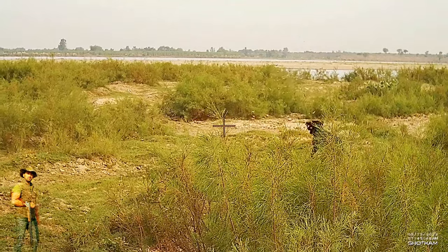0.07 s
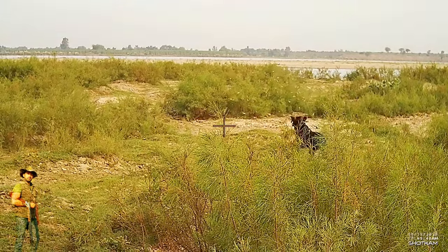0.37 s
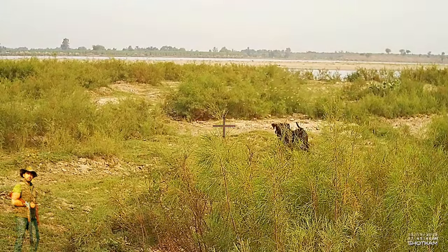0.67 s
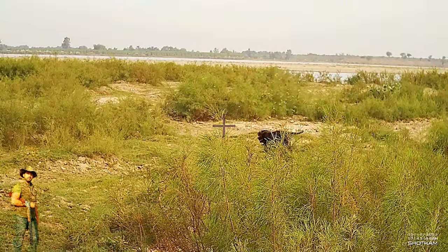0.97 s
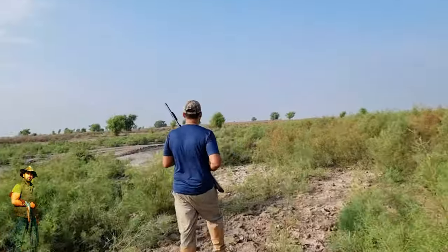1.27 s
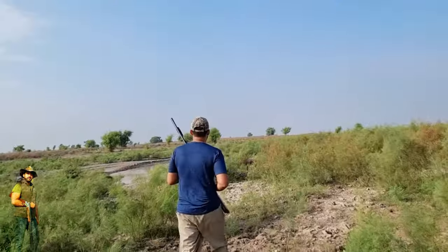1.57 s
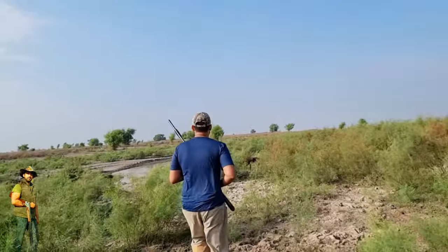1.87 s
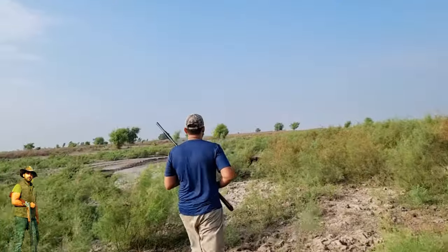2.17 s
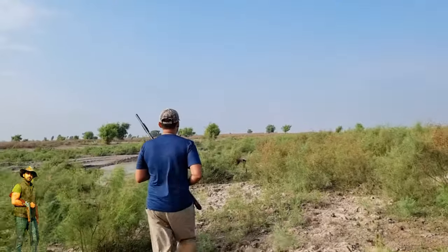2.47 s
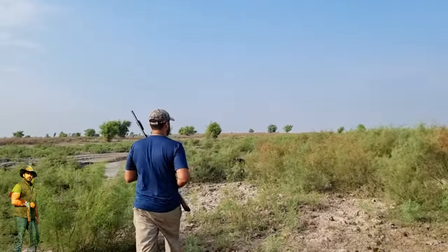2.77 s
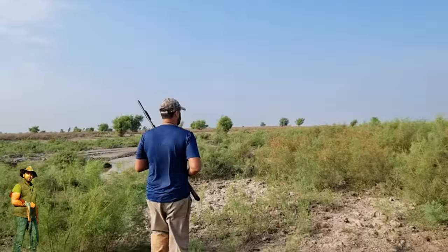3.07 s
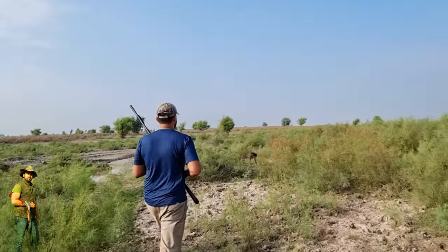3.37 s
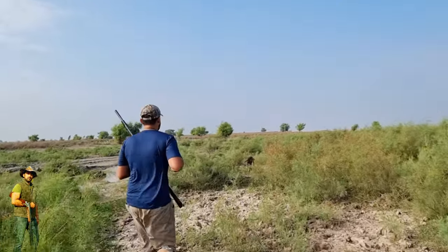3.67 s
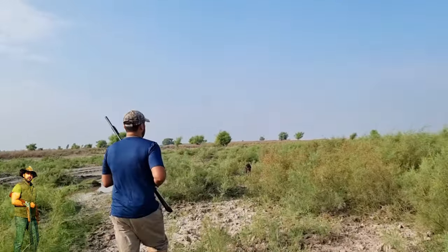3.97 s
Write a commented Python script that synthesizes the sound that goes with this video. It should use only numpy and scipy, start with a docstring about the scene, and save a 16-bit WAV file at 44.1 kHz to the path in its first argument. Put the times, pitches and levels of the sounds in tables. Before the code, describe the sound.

Someone walks through dry scrub in the open, crushing stalks and clods and brushing past grass. The steps start abruptly after a quiet hiss, with low wind buffeting the microphone and a few faint, distant bird whistles.

```python
"""Footsteps through dry brush, cutting in after a quiet mono opening of hiss and faint low tones.
Brittle fracture makes the steps: soles crush stalks and clods in showers of impulses, and twigs snap.
Grass sweeps along the legs, and stiff stems scrape across cloth by stick-slip friction.
Turbulent wind rumbles and thumps on the microphone, while a small bird whistles far off."""
import sys
import numpy as np
from scipy import signal
from scipy.fft import rfft, irfft
from scipy.io import wavfile
from scipy.ndimage import uniform_filter1d

SR = 44100
rng = np.random.default_rng(int(sys.argv[2]) if len(sys.argv) > 2 else 0)


def int16_out(signal):
    """Quantize to a 16-bit WAV file."""
    q = np.round(np.clip(np.atleast_2d(signal).T, -1, 1) * 32767)
    wavfile.write(sys.argv[1], SR, q.astype(np.int16))


N = 176400


def undb(db):
    """Amplitude ratio of a level in decibels."""
    return 10 ** (np.asarray(db) / 20)


def unit(x):
    """Normalisation to an rms of 1."""
    return x / np.sqrt(np.mean(x ** 2) + 1e-20)


def colour(x, points):
    """Minimum-phase filter of unit power through (frequency [Hz], level [dB]) points."""
    hz, db = np.array(points, float).T
    gain = unit(undb(np.interp(np.log(np.fft.rfftfreq(2 * N, 1 / SR) + 1), np.log(hz), db)))
    cepstrum = irfft(np.log(gain))
    cepstrum[1:N] *= 2
    cepstrum[N + 1:] = 0
    return irfft(rfft(x, 2 * N) * np.exp(rfft(cepstrum)))[..., :N]


def band(x, hz, kind, order=2):
    """Butterworth filter: a maximally flat passband."""
    return signal.sosfilt(signal.butter(order, hz, kind, fs=SR, output="sos"), x)


def ring(x, hz, width):
    """Second-order resonance of fractional bandwidth width = 1/Q."""
    return signal.lfilter(*signal.iirpeak(hz, 1 / width, fs=SR), x)


def wander(rate_hz):
    """Smoothed random fluctuation of rms 1."""
    hold = int(SR / rate_hz)
    steps = np.repeat(rng.standard_normal(N // hold + 1), hold)
    return unit(uniform_filter1d(uniform_filter1d(steps, hold), hold)[:N])


def pair(correlation):
    """Partially coherent white noise, left and right."""
    common = np.sqrt(correlation) * rng.standard_normal(N)
    return common + np.sqrt(1 - correlation) * rng.standard_normal((2, N))


def pan(x, db):
    """Interaural level difference, left minus right; negative leans right."""
    return x * undb(np.array([[db], [-db]]) / 2)


def scatter(x, tail_db, tail_s):
    """Scattering by nearby stems and ground adds a diffuse tail, different at each ear."""
    t = np.arange(SR // 10) / SR
    tail = unit(rng.standard_normal((2, len(t))) * np.exp(-t / tail_s)) / np.sqrt(len(t))
    return x + undb(tail_db) * signal.fftconvolve(np.atleast_2d(x), tail, axes=1)[:, :N]


def glides(t, rows, waver, flutter_db):
    """Frequency modulation: sine tones swell and fade along parabolic pitch curves."""
    tones = np.zeros(N)
    drift = 1 + waver * wander(90)
    flutter = undb(flutter_db * wander(50))
    for start, length, first_hz, middle_hz, last_hz, db in rows:
        progress = np.clip((t - start) / length, 0, 1)
        hz = np.polyval(np.polyfit([0, .5, 1], [first_hz, middle_hz, last_hz], 2), progress) * drift
        envelope = np.sqrt(2 * np.abs(np.sin(np.pi * progress)))
        tones += undb(db) * envelope * np.sin(2 * np.pi * np.cumsum(hz) / SR)
    return tones * flutter


def burst(t, peak, rise, decay, per_s, spread_db, max_lag_s=.00026):
    """Shot noise that swells and decays; each impulse has its own size and interaural delay."""
    swell = np.clip(1 + (t - peak) / (2.74 * rise), 0, 1) ** 2
    envelope = swell * np.exp(-np.clip((t - peak) / decay, 0, 30))
    place, size, sign, side = rng.random((int(per_s * N / SR), 4)).T
    sizes = undb(-spread_db * np.log(np.maximum(1 - size, .02))) * np.sign(sign - .5)
    lag = (side - .5) * max_lag_s * SR
    impulses = [np.bincount((place * N + ear * lag).astype(int) % N, sizes, N) for ear in (1, -1)]
    x = np.array(impulses) * envelope
    return x * np.sqrt(2 * np.sum(envelope ** 2) / (np.sum(x ** 2) + 1e-20))


def fractures(t, rows, per_s, spread_db, crossover_hz=7500):
    """Superposed showers of plant fractures; finer stems radiate more treble."""
    body, fine = 0, 0
    for peak, rise, decay, db, treble_db in rows:
        shower = undb(db) * burst(t, peak, rise, decay, per_s, spread_db)
        body += shower
        fine += undb(treble_db) * shower
    treble_share = 1 / (1 + (crossover_hz / (np.fft.rfftfreq(N, 1 / SR) + 1)) ** 5)
    return irfft(rfft(body) * (1 - treble_share) + rfft(fine) * treble_share, N)


def hiss():
    """Stationary band-limited noise, alike in both ears."""
    # hiss spectrum (frequency [Hz], relative density [dB])
    spectrum = [(12, -34.5), (20, 7.5), (39, -4.5), (157, -13), (264, -18), (598, -23), (1140, -28.5),
                (1350, -29), (6460, -34.5), (7500, -37.5), (9750, -41), (16500, -120)]
    noise = colour(rng.standard_normal(N), spectrum)
    return undb(-58) * unit(band(noise, hz=8010, kind="lowpass", order=18))


def low_tones(t):
    """Faint, nearly sinusoidal tones that bend in pitch."""
    # tones (start [s], length [s], first pitch [Hz], middle pitch [Hz], last pitch [Hz], level [dB])
    notes = [(0.057, 0.1, 180, 176, 150, -61.5), (0.388, 0.26, 180, 174, 143, -63),
             (.48, .26, 265, 238, 202, -69.5), (0.42, 0.27, 370, 510, 440, -78),
             (1.05, 0.14, 200, 221, 199, -60)]
    return glides(t, notes, waver=0.0044, flutter_db=2.5)


def air():
    """Ambient noise of the open air, only weakly coherent between the ears."""
    # ambient spectrum (frequency [Hz], relative density [dB])
    spectrum = [(100, -0.5), (400, 7.5), (1000, -4), (1900, -3.5), (3000, -8.5), (5500, -14), (7500, -8.5),
                (8600, -23.5), (12500, -23), (16000, -26.5)]
    gain = undb(-66.5 + 0.27 * wander(5.54))
    return pan(gain * colour(pair(0.22), spectrum), db=-4.5)


def wind(t):
    """Turbulent pressure rumbles on the microphone ports; large eddies reach both nearly alike."""
    # strength of the large and of the small eddies (time [s], level [dB])
    large_levels = [(1.2, -45), (1.42, -45.5), (1.6, -46.5), (1.7, -43.5), (1.88, -43.5), (2.03, -40.5),
                    (2.2, -42.5), (2.4, -42.5), (2.74, -44.5), (2.9, -44.5), (3.1, -37.5), (3.22, -43),
                    (3.4, -39.5), (3.55, -41), (3.68, -45.5), (3.84, -40), (4.0, -49)]
    small_levels = [(1.2, -58.5), (1.55, -53), (1.93, -48.5), (2.02, -46), (2.4, -44.5), (2.52, -47),
                    (2.62, -44.5), (2.68, -43.5), (2.78, -42.5), (2.9, -58), (3.1, -48), (3.22, -50.5),
                    (3.32, -46.5), (3.47, -46.5), (3.66, -58.5), (3.8, -46.5), (3.89, -54), (4.0, -46.5)]
    # their spectra (frequency [Hz], relative density [dB])
    large_spectrum = [(15, -26.5), (30, -12), (50, -1.5), (66, -0.5), (82, 2), (105, -4), (130, -9.5),
                      (180, -30), (400, -52), (3000, -83)]
    small_spectrum = [(40, -13.5), (100, -16.5), (140, 0), (200, -6), (300, -13.5), (400, -21), (470, -27),
                      (900, -49), (3000, -68.5)]
    large = unit(colour(pair(0.82), large_spectrum))
    large *= undb(np.interp(t, *np.array(large_levels).T) + 1.63 * wander(21.935))
    small = unit(colour(pair(0.36), small_spectrum))
    small *= undb(np.interp(t, *np.array(small_levels).T) + 2 * wander(28.005))
    return large + small


def stems(t):
    """Stick-slip friction on cloth drives each stiff stem at its own resonance."""
    # scrapes (peak [s], rise [s], decay [s], relative level [dB], resonance [Hz])
    scrapes = [(1.202, 0.0037, .04, -64, 1880), (1.27, .015, 0.066, -69, 1620),
               (2.568, .008, 0.018, -70, 12400), (2.638, 0.01, 0.013, -61, 12500),
               (2.642, 0.011, 0.011, -69, 9700), (2.735, 0.018, 0.022, -69, 12300),
               (2.77, .015, .015, -71, 9600)]
    x = 0
    for peak, rise, decay, db, hz in scrapes:
        slips = burst(t, peak, rise, decay, per_s=3600, spread_db=6)
        width = 0.12 * (10000 / hz) ** 0.67
        x += undb(db) * slips.std() * unit(ring(ring(slips, hz, width), hz, width))
    return pan(x, db=-12.5)


def grass(t):
    """Dense, tiny fractures merge into a rustle as grass sweeps along the legs and springs back."""
    # sweeps (peak [s], rise [s], decay [s], relative level [dB], treble gain [dB])
    sweeps = [(1.265, 0.055, 0.1, -64, 0), (1.346, 0.0089, 0.04, -51, -18), (1.40, 0.018, 0.088, -58, -20),
              (1.84, 0.033, 0.12, -56.5, -8), (2.07, 0.037, 0.091, -59.5, 3.5),
              (2.242, 0.052, 0.017, -61, 8.5), (2.459, 0.012, 0.0078, -58, 3.5),
              (2.60, 0.016, 0.11, -57, -18), (2.643, 0.013, 0.013, -53.5, 2.5),
              (2.76, 0.033, 0.032, -63, 8), (2.86, 0.16, 0.12, -69.5, -19), (2.999, 0.018, 0.17, -63, -20),
              (3.125, 0.051, 0.1, -56.5, -12), (3.288, 0.011, 0.041, -63.5, 2),
              (3.39, 0.074, 0.33, -65, -12), (3.588, 0.046, 0.068, -51.5, -13),
              (3.70, 0.018, 0.054, -56, -2), (3.841, 0.084, 0.053, -58.5, -0.5),
              (3.975, 0.029, 0.016, -56, -14)]
    # rustle spectrum (frequency [Hz], relative density [dB])
    spectrum = [(200, -27), (700, -16), (1050, 0.5), (1500, 2.5), (2400, 3), (3500, -1.5), (5000, -5.5),
                (7400, -5), (8600, -16.5), (11000, -14.5), (12500, -9.5), (13800, -12.5), (16000, -8.5)]
    rustle = colour(fractures(t, sweeps, per_s=4000, spread_db=3.5), spectrum)
    return pan(scatter(rustle, tail_db=-10.5, tail_s=0.011), db=-5)


def buffets(t):
    """Single eddies thump the ports for a few cycles; their phase difference grows with frequency."""
    # pressure pulses (peak [s], Gaussian width [s], level [dB], pitch [Hz])
    pulses = [(1.28, 0.016, -46.5, 150), (1.576, 0.0091, -38.5, 79), (1.657, 0.011, -41, 154),
              (1.731, 0.012, -36, 69.2), (1.793, 0.012, -41, 69), (1.833, 0.011, -44.5, 151),
              (1.984, 0.035, -45.5, 230.3), (2.047, 0.017, -31.5, 86), (2.16, 0.034, -37.5, 100),
              (2.218, 0.016, -35, 84), (2.24, 0.029, -43.5, 175.3), (2.267, 0.014, -37.5, 70.3),
              (2.30, .012, -32, 118.9), (2.348, 0.0072, -35, 155.5), (2.432, .008, -52.5, 245.5),
              (2.451, .014, -35.5, 101), (2.485, 0.022, -45, 144.4), (2.594, .018, -41, 85.7),
              (2.702, 0.006, -47, 272), (2.725, 0.015, -35, 97.3), (2.774, .03, -56, 281.7),
              (3.008, 0.025, -38, 70.36), (3.108, 0.03, -41, 79.5), (3.233, 0.0098, -35.5, 143),
              (3.487, 0.024, -40, 148.8), (3.522, 0.0197, -34.5, 75.7)]
    radians_per_hz, pitch_wander = 0.0086, 0.1576
    x = 0
    for peak, width, db, hz in pulses:
        envelope = np.exp(-.5 * ((t - peak) / width) ** 2)
        port_phase = radians_per_hz * hz * rng.choice([-1, 1]) * np.array([[.5], [-.5]])
        cycles = rng.random() + np.cumsum(hz * (1 + pitch_wander * wander(120))) / SR
        x += undb(db) * np.sqrt(2) * envelope * np.sin(2 * np.pi * cycles + port_phase)
    return x


def twigs(t):
    """Brittle fracture: each twig splinters for a moment, then cracks in a broad resonance."""
    # cracks of twigs and grit (peak [s], relative level [dB], resonance [Hz])
    snaps = [(1.303, -48, 1450), (1.388, -40, 1200), (1.398, -42, 1250), (1.406, -50.5, 2880),
             (1.445, -50, 1870), (1.531, -55, 2160), (1.811, -38, 3080), (1.828, -42, 2900),
             (1.842, -45, 2670), (1.909, -50, 5300), (1.947, -52.5, 3400), (2.008, -45, 2400),
             (2.016, -39, 1870), (2.081, -45, 3880), (2.136, -48.5, 1890), (2.272, -40, 4520),
             (2.341, -56, 4020), (2.365, -48, 2750), (2.516, -41, 1900), (2.548, -47, 1990),
             (2.762, -53.5, 3050), (2.942, -52, 3840), (2.968, -51, 1540), (2.996, -43.5, 2230),
             (3.056, -40.5, 1780), (3.093, -38.5, 1420), (3.101, -34.5, 5830), (3.107, -38.5, 1400),
             (3.147, -50, 5030), (3.161, -53.5, 5100), (3.198, -53, 4000), (3.285, -53, 2010),
             (3.54, -52, 3780), (3.637, -55, 2300), (3.746, -53, 4440), (3.813, -49, 1700),
             (3.855, -50, 2080)]
    splinter_s, decay_s = 0.00088, 0.0016
    x = 0
    for peak, db, hz in snaps:
        falloff = np.where(t < peak, (peak - t) / splinter_s, (t - peak) / decay_s)
        crack = unit(band(pair(0.14), [hz * 0.71, hz * 1.334], "bandpass"))
        x += undb(db) * np.exp(-np.clip(falloff, 0, 30)) * crack
    return pan(undb(-3) * scatter(x, tail_db=-3, tail_s=0.008), db=-4)


def stalks(t):
    """Dry stalks fracture under the load of a sole in short, coarse crunches."""
    # crunches (peak [s], rise [s], decay [s], relative level [dB], treble gain [dB])
    crunches = [(1.333, 0.0086, 0.0048, -40.5, -2), (1.813, 0.015, 0.0059, -48, -13),
                (1.826, 0.0028, 0.011, -44, -8), (2.013, 0.018, .01, -46, -17),
                (2.052, .001, 0.008, -44.5, -0.5), (2.276, 0.018, 0.003, -54.5, 6.5),
                (2.312, 0.0049, 0.014, -53, -2), (2.343, 0.0023, 0.016, -50, -6),
                (2.367, 0.0077, 0.0024, -47, -8), (2.511, 0.0091, 0.0091, -53.5, -31),
                (2.552, 0.0094, 0.0099, -47, -5.5), (3.058, 0.0052, 0.016, -50, -15),
                (3.094, 0.0051, 0.019, -52.5, 2), (3.105, 0.0018, 0.0037, -43.5, 0),
                (3.305, 0.0037, 0.0062, -55, -3), (3.544, 0.0036, 0.0094, -49, -4),
                (3.672, .003, 0.0049, -51, -6), (3.865, 0.0029, 0.0027, -64, 16),
                (3.998, 0.0038, .01, -55, -8)]
    # crunch spectrum (frequency [Hz], relative density [dB])
    spectrum = [(200, -33), (700, -45), (1100, -16.5), (1450, -0.5), (2300, 1), (3400, 0.5), (5000, -2.5),
                (6200, -5), (7400, -1), (8600, -13.5), (12500, -10), (16000, -13)]
    crunch = colour(fractures(t, crunches, per_s=3200, spread_db=1.5), spectrum)
    return pan(scatter(crunch, tail_db=-8.5, tail_s=0.033), db=-5)


def clods(t):
    """Granular crumbling of dry soil underfoot; smaller clods resonate higher."""
    # weight landing on clods (peak [s], rise [s], decay [s], relative level [dB], resonance [Hz])
    treads = [(1.334, 0.005, 0.027, -50, 560), (1.385, .023, 0.043, -50, 620),
              (1.531, 0.0012, 0.0043, -52.5, 880), (1.755, 0.056, 0.091, -61.5, 414),
              (2.016, .016, 0.012, -47.5, 526), (2.14, 0.053, 0.072, -68, 474),
              (2.362, 0.01, 0.0036, -55, 490), (2.434, 0.0063, 0.028, -67, 497),
              (2.532, .0033, .006, -47.5, 770), (2.546, 0.0034, 0.01, -41, 810),
              (2.56, 0.0039, 0.0032, -50.5, 800), (2.64, 0.029, 0.011, -62, 1240),
              (2.704, 0.021, 0.015, -58, 750), (2.754, .022, 0.028, -56.5, 467),
              (3.102, 0.0088, 0.013, -55, 1360), (3.284, .002, 0.013, -53.5, 560),
              (3.40, 0.033, 0.079, -69.5, 550), (3.608, 0.0079, 0.0079, -51.5, 680),
              (3.637, .002, 0.011, -52, 616), (3.695, 0.018, 0.031, -54.5, 606),
              (3.759, 0.0039, 0.0085, -51.5, 990), (3.815, .002, 0.017, -52, 880)]
    # dull response of the soil (frequency [Hz], relative gain [dB])
    soil = [(80, -26.5), (250, -1), (420, 0), (800, -5), (1100, -6.5), (1500, -3.5), (2500, -15.5),
            (6000, -15), (16000, -46)]
    x = 0
    for peak, rise, decay, db, hz in treads:
        grains = burst(t, peak, rise, decay, per_s=760, spread_db=2)
        x += undb(db) * (grains + undb(7.5) * ring(grains, hz, width=0.38))
    return pan(undb(-2.5) * scatter(colour(x, soil), tail_db=-20, tail_s=0.052), db=-1.6)


def bird(t):
    """Gliding whistles from far off, where scattered sound outweighs direct sound."""
    # calls (start [s], length [s], first pitch [Hz], middle [Hz], last [Hz], direct level [dB])
    whistles = [(1.578, 0.071, 4250, 4010, 3450, -77), (2.168, 0.061, 4600, 4300, 4030, -82),
                (2.39, .05, 4100, 3750, 3450, -78), (3.232, 0.054, 3630, 4060, 3980, -75),
                (3.357, 0.09, 5330, 4330, 3300, -70.5)]
    direct = glides(t, whistles, waver=0.0123, flutter_db=2.5)
    return scatter(direct, tail_db=1.5, tail_s=0.014)


def scene():
    """Sources add by superposition; a brief crossfade cuts from the mono opening to the walk."""
    t = np.arange(N) / SR
    cut_s, crossfade_s = 1.196, 0.015
    opening = hiss() + low_tones(t)
    background = air() + bird(t)
    steps = stalks(t) + grass(t) + clods(t) + twigs(t) + stems(t)
    walk = background + steps + wind(t) + buffets(t)
    fade = np.clip((t - cut_s) / crossfade_s + .5, 0, 1)
    return (1 - fade) * opening + fade * walk


def record(dry):
    """Band limiting: a steep elliptic low-pass removes the highest treble."""
    cutoff_hz = 15850
    return signal.sosfilt(signal.ellip(10, .2, 70, cutoff_hz, fs=SR, output="sos"), dry)


dry = scene()
out = record(dry)
int16_out(out)
```